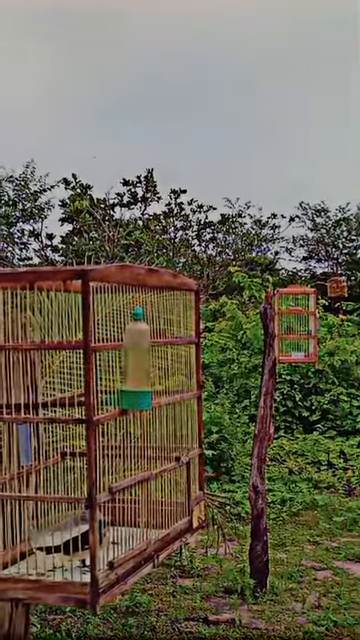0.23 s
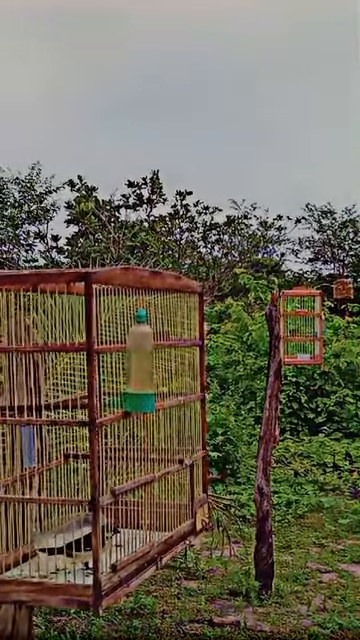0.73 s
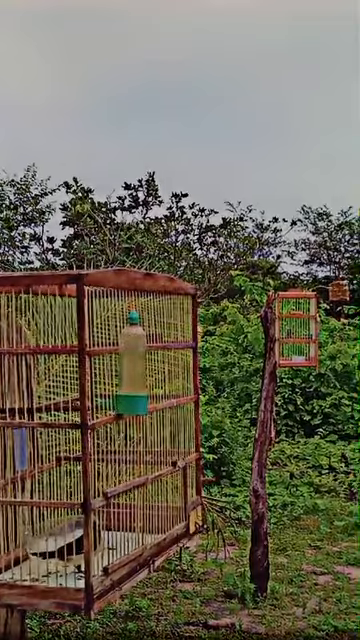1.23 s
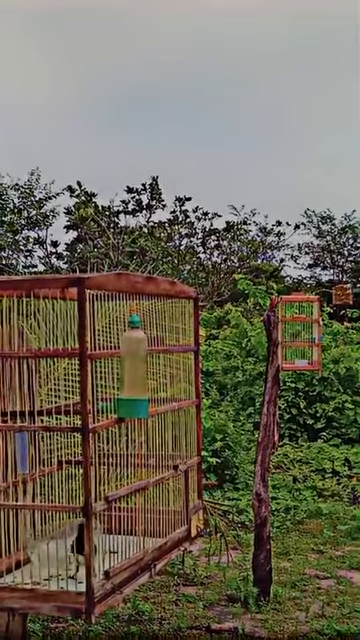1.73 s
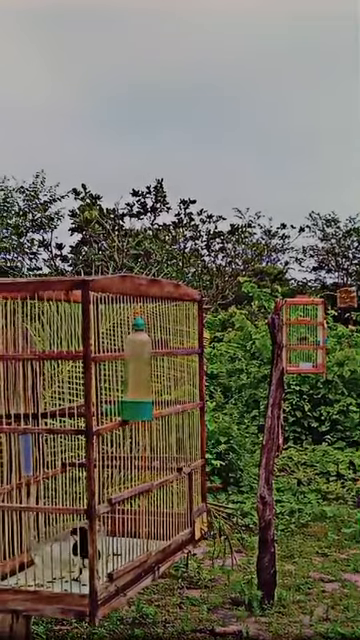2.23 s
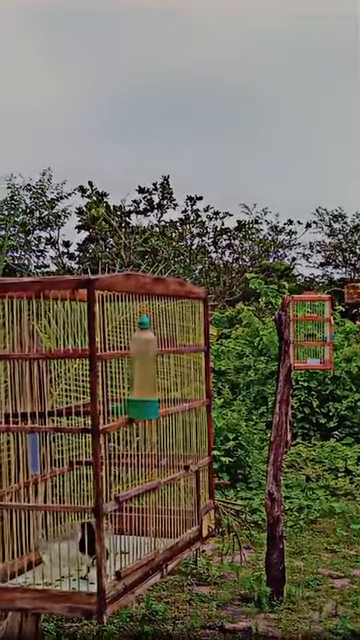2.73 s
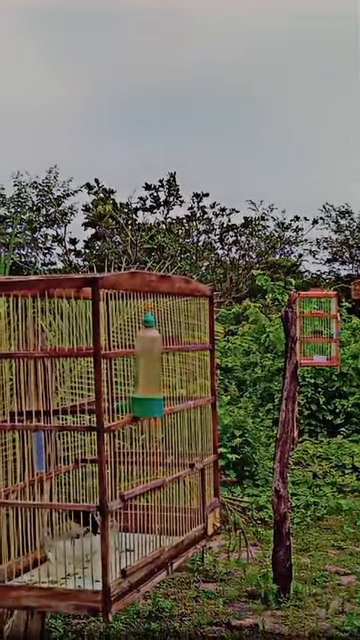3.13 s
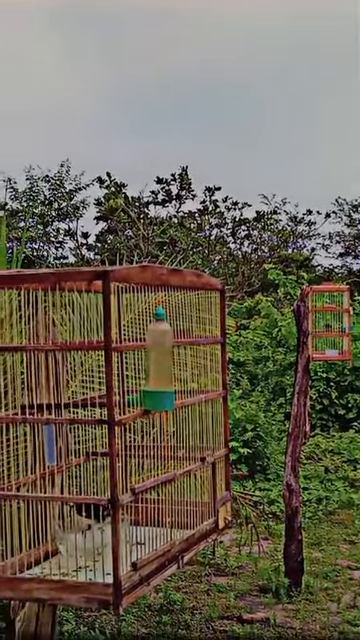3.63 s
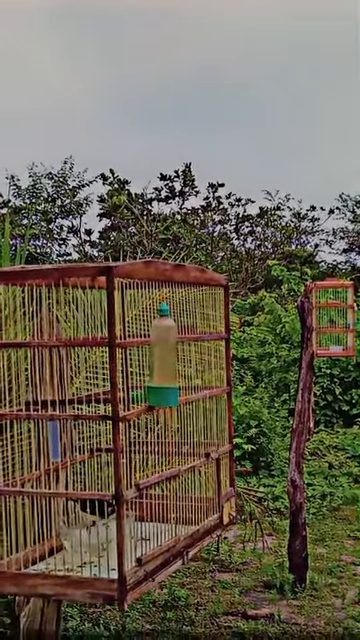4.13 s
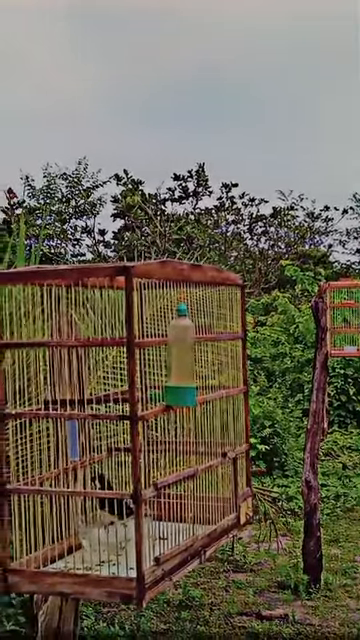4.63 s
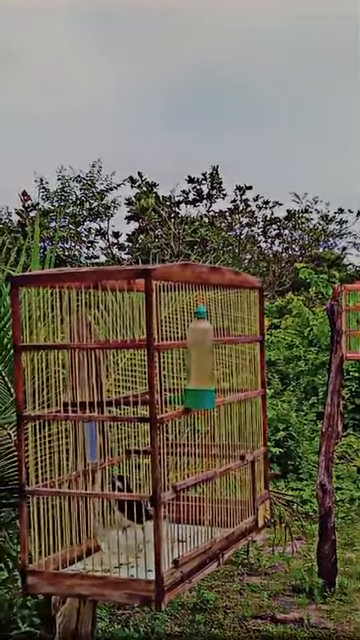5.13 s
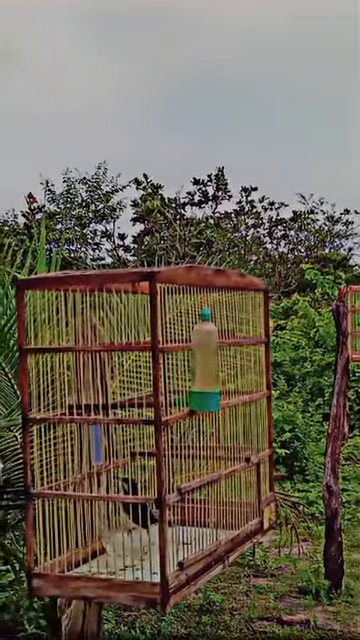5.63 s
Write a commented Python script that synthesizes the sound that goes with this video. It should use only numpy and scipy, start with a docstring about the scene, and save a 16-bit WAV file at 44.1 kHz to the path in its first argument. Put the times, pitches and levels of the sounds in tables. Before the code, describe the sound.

Outdoor garden, fairly dry, with short reflections off cage and bushes. A high continuous cricket whirr runs throughout. A nearby little bird starts quietly with pips and falling whistles, brushes its wings, trills evenly, slides up on a hoarse nasal tone, then chatters loudly and rapidly before stopping. Faint birds whistle further off.

```python
"""Caged seedeater in song

A seedeater in a wooden cage outdoors sings soft whistles, slurs and trills, a nasal rising note, then a loud
burst of chips and warbles: gliding tones with overtones. Wings flutter as filtered noise when it turns.
Short delays and decaying noise echo the song off cage and bushes. A cricket trills in falling wing-stroke
tones; small birds whistle further off, over noise bands of open air, low swells and distant insects."""
import sys
import numpy as np
from scipy import signal
from scipy.fft import rfft, irfft, next_fast_len
from scipy.io import wavfile
from scipy.ndimage import uniform_filter1d, map_coordinates

SR = 44100
rng = np.random.default_rng(int(sys.argv[2]) if len(sys.argv) > 2 else 0)


def to_wav(sig):
    """Store sig (one row per channel, or 1-D mono) as 16-bit WAV at the path in sys.argv[1].

    Samples outside -1..1 are clipped; the rate is SR.
    """
    pcm = np.clip(np.atleast_2d(sig), -1, 1) * 32767
    pcm = np.round(pcm).astype(np.int16)
    wavfile.write(sys.argv[1], SR, pcm.T)  # frames by channels


N = 259308
T = np.arange(N) / SR


def amp(db):
    """Decibels to linear gain."""
    return 10 ** (np.asarray(db) / 20)


def unit(x):
    """x scaled to rms 1."""
    return x / np.sqrt(np.mean(x ** 2) + 1e-20)


def along(points, hz):
    """(frequency [Hz], value) points read on a log frequency axis."""
    f, v = np.transpose(points)
    return np.interp(np.log(hz + 1), np.log(f + 1), v)


def curves(rows, t=T):
    """Each column after the first, read at the times t."""
    s, *cols = np.transpose(rows)
    return [np.interp(t, s, c) for c in cols]


def wobble(rate, n=N):
    """A smooth random curve with rate knots a second."""
    knots = rng.standard_normal(int(n * rate / SR) + 4)
    return map_coordinates(knots, [np.arange(n) * rate / SR])


def filtered(x, response):
    """x times a response of frequency."""
    m = next_fast_len(N + SR // 2)
    return irfft(rfft(x, m) * response(np.fft.rfftfreq(m, 1 / SR)), m)[:N]


def coloured(x, points):
    """x through a (frequency [Hz], level [dB]) spectrum."""
    return filtered(x, lambda hz: amp(along(points, hz)))


def noise(points):
    """Noise of rms 1 with the given spectral shape."""
    return unit(coloured(rng.standard_normal(N), points))


def add(out, s, x):
    """Mix x into out from time s on."""
    part = out[max(round(s * SR), 0):][:len(x)]
    part += x[:len(part)]


# Resonance of the throat: (frequency [Hz], width [Hz])
THROAT_RESONANCE = (4620, 593)


def throat(hz):
    """Gain of the throat's resonance, which favours partials near its centre."""
    centre_hz, width_hz = THROAT_RESONANCE
    return 1 / (1 + ((hz - centre_hz) / width_hz) ** 4)


def gesture(rows):
    """Control curves smoothed by muscle inertia, and a gate that opens and shuts softly."""
    fade_s = .0035
    t = np.arange(rows[0][0], max(rows[-1][0], rows[0][0] + 2 * fade_s), 1 / SR)
    edge = np.clip(np.minimum(t - t[0], t[-1] - t) / fade_s, 0, 1)
    gate = np.sin(np.pi / 2 * edge) ** 2
    return [uniform_filter1d(c, size=64) for c in curves(rows, t)] + [gate]


# Overtones of the voice: (multiple of the pitch, level when soft [dB], level when forced [dB])
VOICE_OVERTONES = [(2, -27.5, -32), (3, -32, -36.5), (4, -42, -42.5), (5, -56, -55.5)]
FORCED_DB, FORCED_RANGE_DB = -38, 14.5  # straining begins at this level; fully forced this much higher


def whistle(rows, rasp, overtones, shimmer_db=3.32, forced_shimmer_db=-0.6, blur=1.0):
    """The syrinx makes a nearly pure tone with weak overtones, which blur when it is forced."""
    hz, db, gate = gesture(rows)
    n = len(hz)
    forced = np.clip((db - FORCED_DB) / FORCED_RANGE_DB, 0, 1)
    unsteady = .002 + .0004 * np.maximum(db + 32, 0)
    phase = 2 * np.pi * np.cumsum(hz * (1 + unsteady * wobble(800, n))) / SR
    upper = np.zeros(n)
    for k, soft, hard in overtones:
        gain = amp(soft + forced * (hard - soft) + 3.2 * wobble(300, n))
        partial = np.sin(k * phase + blur * forced * wobble(1800, n))
        upper += gain * partial * (k * hz < SR / 2)
    # A rasping note doubles its period; the throat passes the extra partials that lie near it.
    harsh = np.zeros(n)
    for k in (3 / 2, 2, 5 / 2):
        harsh += (throat(k * hz) + 0.075) * np.sin(k * phase) * (1 + 0.5 * wobble(555.8, n))
    level = amp(db + (shimmer_db + forced_shimmer_db * forced) * wobble(250, n))
    return gate * level * (np.sin(phase) + upper + rasp * harsh)


def sing(notes, rasp=0, overtones=VOICE_OVERTONES):
    """Whistle each list of (time [s], pitch [Hz], level [dB]) rows at its time."""
    out = np.zeros(N)
    for rows in notes:
        add(out, rows[0][0], whistle(rows, rasp, overtones))
    return out


def stretched(shape, s, length, high, low, db, contrast=1):
    """A syllable shape laid over one note's length, pitch range and strength."""
    return [(s + u * length, low + p * (high - low), db + contrast * level) for u, p, level in shape]


def syllables(table, shape):
    """Sing one syllable shape for each (time, length, high, low, level) note."""
    return sing([stretched(shape, *note) for note in table])


# Falling chip: (share of the note's length [0-1], pitch from low to high [0-1], level [dB])
CHIP_SHAPE = [(0, .8, -19), (.1, .97, -4), (.2, .87, 0), (.4, .57, -2), (.62, .37, -2), (.78, .23, -10),
              (.9, .09, -20), (1, 0, -27)]
# Strokes of a chatter phrase, two ticks and two longer chips:
# (time after its start [s], length [s], high [Hz], low [Hz], level [dB], share of the hold-back [0-1]),
# times and lengths before the phrase's stretch
PHRASE_STROKES = [(0, .0125, 4280, 2750, -1.5, .8), (.012, .008, 4880, 3400, -2, 1),
                  (.018, .0245, 4730, 2400, 1, .35), (.0495, .034, 4800, 1880, 0, 0)]
# The phrases: (time [s], stretch in time [ratio], level [dB], hold-back of the opening [dB])
CHATTER_PHRASES = [(4.397, 0.78, -29, 16), (4.4985, .93, -25.5, 4), (4.6101, .92, -16, 17),
                   (4.9801, 1, -16, 1.5), (5.0993, 0.99, -16.5, 0), (5.2176, 0.99, -17.5, -4)]
# Grace notes ahead of a long chip: (time [s], length [s], high [Hz], low [Hz], level [dB])
GRACE_NOTES = [(4.427, 0.0082, 5050, 3400, -36.5), (4.6464, 0.016, 5280, 3520, -35)]


def chatter():
    """The syrinx fires one four-stroke phrase six times; the first three are hurried and open softly."""
    chips = []
    for s, stretch, db, held_db in CHATTER_PHRASES:
        for after, length, high, low, level, share in PHRASE_STROKES:
            stroke_db = db + level - share * held_db
            chips.append((s + stretch * after, stretch * length, high, low, stroke_db))
    return syllables(chips + GRACE_NOTES, CHIP_SHAPE)


# Closing slide of a warble: (time after the last crest [s], pitch [Hz], level against the warble [dB])
CLOSING_SLIDE = [(.005, 3144, 3), (.012, 2345, -5), (.025, 1500, -42)]
SWING_HZ, ARCH_HZ, SWING_SCATTER_HZ = 786, 343, 154  # swing either side of centre; arch height; unevenness
WARBLE_SWELL_DB, WARBLE_SWELL_S, TROUGH_DB = 7, 0.0088, -2  # swelling start; dip at the foot of each swing
DOWNSTROKE_DB = 2  # the falling half of each swing is louder, the rising half softer by this much


def warble(s, period, centre_hz, db, count=12):
    """The pitch swings up and down under a shallow arch, then slides away from the last crest."""
    turn = np.arange(count)
    arch_hz = ARCH_HZ * (np.sin(np.pi * turn / (count - 1)) - .5)
    scatter_hz = SWING_SCATTER_HZ * rng.standard_normal(count)
    turn_hz = centre_hz - SWING_HZ * np.cos(np.pi * turn) + arch_hz + scatter_hz
    step = np.arange(2 * count - 1) / 2  # every turning point and the midpoints between
    t = step * period / 2
    level = db - WARBLE_SWELL_DB * np.exp(-t / WARBLE_SWELL_S)
    level += TROUGH_DB * np.cos(np.pi * step / 2) ** 2
    level -= DOWNSTROKE_DB * np.sin(np.pi * step)
    swings = list(zip(s + t, np.interp(step, turn, turn_hz), level))
    return swings + [(s + t[-1] + after, fall_hz, db + fall_db) for after, fall_hz, fall_db in CLOSING_SLIDE]


# Harsh warbles: (time [s], period of a swing [s], centre [Hz], level [dB])
HARSH_WARBLES = [(4.7205, .0127, 3643, -21), (4.8583, .0118, 3292, -19.5)]


def warbles():
    """Fast pitch swings, made harsh by period doubling in the syrinx."""
    return sing([warble(*row) for row in HARSH_WARBLES], rasp=.16)


# Freely gliding notes, one list each: (time [s], pitch [Hz], level [dB])
GLIDING_NOTES = [
    [(.195, 2520, -52), (.212, 3580, -54.5), (.26, 3647, -45.5), (.32, 3620, -51), (.38, 3530, -60)],
    [(1.942, 4630, -46.5), (1.951, 5300, -44), (1.961, 5700, -40), (1.976, 5400, -56)],
    [(5.347, 5110, -40), (5.353, 5280, -40), (5.359, 5664, -47.5), (5.364, 5370, -20.5),
     (5.372, 4575, -18.5), (5.382, 3910, -23.5), (5.398, 3244, -25), (5.406, 3072, -34.5),
     (5.413, 2986, -60)],
]


def glides():
    """Single whistles whose pitch moves freely as the syrinx changes its tension."""
    return sing(GLIDING_NOTES)


# Hiss of a forced note: (frequency [Hz], relative level [dB per Hz])
SPRAY_SPECTRUM = [(1200, -36), (2500, -4), (5000, 0.5), (8000, 7), (10500, -8), (13000, -2), (15500, -0.5)]


def spray(x, spray_db=-32):
    """Breath turbulence: a wide hiss that follows the strength of the notes."""
    return amp(spray_db) * uniform_filter1d(np.abs(x), size=128) * noise(SPRAY_SPECTRUM)


# Small pip: (share of the note's length [0-1], pitch from low to high [0-1], level [dB])
PIP_SHAPE = [(0, 1, -16), (.3, .75, -3), (.55, .45, 0), (.75, .15, -4), (1, 0, -16)]
# Hooked trill note: (share of the note's length [0-1], pitch from low to high [0-1], level [dB])
HOOK_SHAPE = [(0, 0, -12), (.13, .4, -9), (.3, .63, -19), (.55, .86, -19), (.64, .93, -11), (.73, .98, -1),
              (.82, 1, 0), (.92, .99, -6), (1, .97, -14)]
# Range and effort along the trill:
# (time [s], high [Hz], low [Hz], level [dB], how far the top stands out of the upsweep [0-1])
TRILL_COURSE = [(2.29, 4074, 2590, -40, 0.9), (2.36, 3970, 2308, -39, 0.73), (2.431, 3893, 1980, -32.5, 1),
                (2.598, 3903, 1920, -32, 1), (2.72, 3830, 1890, -35.5, 0.91), (2.79, 3884, 1905, -29.5, 1),
                (2.92, 3688, 1764, -42, 0.43), (3.099, 3670, 1770, -41, 0.47), (3.19, 2866, 1750, -54, 0)]
# Overtones in the trill: (multiple of the pitch, level when soft [dB], level when forced [dB])
TRILL_VOICE = [(2, -34.5, -30), (3, -34, -29), (4, -39.5, -45.5), (5, -55, -50)]
TRILL_START_S, TRILL_PERIOD_S, TRILL_NOTE_S = 2.3068, .0566, .0445
TRILL_DRAG_S, TRILL_PICKUP_NOTES = 0.022, 0.38  # the first note is earlier and longer; how soon this fades


def trill(count=17, lag=0.88, blip_s=0.0055, high_hz=2600, low_hz=2000, under_db=-19):
    """Hooked notes at an even pace, each with a soft low blip from the other side of the syrinx."""
    k = np.arange(count)
    drag = TRILL_DRAG_S * np.exp(-k / TRILL_PICKUP_NOTES)
    starts = TRILL_START_S + k * TRILL_PERIOD_S - drag
    notes = list(zip(starts, TRILL_NOTE_S + drag, *curves(TRILL_COURSE, starts)))
    hooks = [stretched(HOOK_SHAPE, *note) for note in notes]
    blips = [(s + lag * length, blip_s, high_hz, low_hz, db + under_db)
             for s, length, high, low, db, contrast in notes]
    return sing(hooks, overtones=TRILL_VOICE) + syllables(blips, PIP_SHAPE)


# Rising note: (share of the note's length [0-1], pitch from low to high [0-1], level [dB])
RISE_SHAPE = [(0, 0.016, -2), (.15, 0.39, -11.5), (.35, .5, -8), (0.618, .6, -5.5), (.8, .85, -3),
              (.93, .98, -0.5), (1, 1, -29)]
# Rising notes that lead into the trill: (time [s], length [s], high [Hz], low [Hz], level [dB])
RISING_NOTES = [(1.988, 0.051, 5260, 2580, -37.5), (2.066, 0.049, 5090, 2577, -38.5),
                (2.14, 0.053, 5110, 2405, -39.5), (2.216, 0.051, 4630, 2500, -44)]


def rises():
    """Quick upsweeps of the syrinx that lead into the trill."""
    return syllables(RISING_NOTES, RISE_SHAPE)


# Falling slur: (share of the note's length [0-1], pitch from low to high [0-1], level [dB])
SLUR_SHAPE = [(0, 1, -14), (.09, .83, 0), (.24, .52, 1), (.38, .32, -1), (.5, .22, -15), (.8, .1, -21),
              (1, 0, -26)]
# Two falling slurs: (time [s], length [s], high [Hz], low [Hz], level [dB])
SLUR_NOTES = [(.696, 0.084, 5130, 3224, -30), (.916, 0.095, 4905, 3215, -31)]


def slurs():
    """Whistles that drop steeply and then trail off softly."""
    return syllables(SLUR_NOTES, SLUR_SHAPE)


# A run of pips that settles on one pitch: (time [s], level [dB])
PIP_RUN_NOTES = [(1.171, -43), (1.237, -39.5), (1.292, -37), (1.348, -39), (1.398, -38.5), (1.452, -37),
                 (1.5, -37.5), (1.566, -37), (1.624, -37), (1.748, -43), (1.803, -37.5)]
PIP_S, SETTLE_S = 0.031, 0.12  # length of a pip; time the run takes to settle
PIP_HIGH_HZ, PIP_LOW_HZ = 3889, 3792  # start and end of a settled pip
PIP_HIGH_LIFT_HZ, PIP_LOW_LIFT_HZ = 1350, 757  # how much higher the run begins


def pip_run():
    """Falling pips that start high and steep, then sink and flatten."""
    s, db = np.transpose(PIP_RUN_NOTES)
    lift = np.exp(-((s - s.min()) / SETTLE_S) ** (3 / 2))
    high = PIP_HIGH_HZ + PIP_HIGH_LIFT_HZ * lift
    low = PIP_LOW_HZ + PIP_LOW_LIFT_HZ * lift
    return syllables(zip(s, np.full(len(s), PIP_S), high, low, db), PIP_SHAPE)


# Single soft pips: (time [s], length [s], high [Hz], low [Hz], level [dB])
SOFT_PIP_NOTES = [(0.373, 0.048, 3560, 3050, -52), (.425, 0.042, 3460, 3080, -49),
                  (.465, 0.04, 3430, 3040, -49.5), (0.51, 0.042, 3320, 3090, -49),
                  (.667, 0.016, 6440, 5800, -39), (.68, 0.022, 5920, 4880, -45),
                  (0.773, 0.014, 2630, 1760, -50), (.801, 0.0143, 2640, 2060, -57),
                  (0.891, 0.017, 6800, 5540, -53.5), (1.004, 0.015, 2660, 1630, -50.5),
                  (1.033, 0.0093, 2750, 2140, -50), (3.27, 0.015, 1880, 1790, -54.5)]


def soft_pips():
    """Brief falling whistles at low effort."""
    return syllables(SOFT_PIP_NOTES, PIP_SHAPE)


# Hoarse arch and then a long rise: (time [s], pitch [Hz], fundamental level [dB], overtone level [dB])
NASAL_NOTE = [(3.383, 1525, -81, -57), (3.415, 2424, -63.5, -47), (3.44, 2180, -64, -47.5),
              (3.448, 1316, -69.5, -53.5), (3.472, 1634, -60.5, -36.5), (3.523, 2452, -51, -45.5),
              (3.563, 2088, -58.5, -39.5), (3.707, 2520, -64.5, -53.5), (3.818, 2630, -51.5, -41),
              (3.869, 2694, -50, -51), (3.905, 2757, -48.5, -39.5), (3.96, 2726, -42, -66),
              (3.975, 2880, -73, -70)]
# Overtones that bypass the throat: (multiple of the pitch, level [dB])
THROAT_BYPASS = [(2, -16.5), (3, -24.5), (4, -32), (5, -35.5), (6, -35)]
HOARSE_S, HOARSE_JITTER, HOARSE_GRAIN = .12, .008, .35  # fade time; roughness of pitch and of level
SECOND_SIDE, SECOND_SIDE_DB = .83, -6  # pitch ratio and level of the second side


def nasal():
    """A low buzzy voice, its overtones picked out by the throat; the syrinx's second side joins at first."""
    hz, base_db, over_db, gate = gesture(NASAL_NOTE)
    n = len(hz)
    rough = np.exp(-(np.arange(n) / SR / HOARSE_S) ** 2)
    voice = np.zeros(n)
    for pitch, gain in ((hz, 1), (SECOND_SIDE * hz, amp(SECOND_SIDE_DB) * rough)):
        phase = 2 * np.pi * np.cumsum(pitch * (1 + HOARSE_JITTER * rough * wobble(420, n))) / SR
        upper = np.zeros(n)
        for k, leak_db in THROAT_BYPASS:
            passed = throat(k * pitch) + amp(leak_db)
            upper += passed * amp(2.1 * wobble(160, n)) * np.sin(k * phase)
        base = amp(base_db + 3.1 * wobble(160.9, n)) * np.sin(phase)
        voice += gain * (base + amp(over_db) * upper)
    out = np.zeros(N)
    add(out, NASAL_NOTE[0][0], gate * voice * (1 + HOARSE_GRAIN * rough * wobble(1000, n)))
    return out


# Radiation from the beak: (frequency [Hz], gain [dB])
BEAK_RADIATION = [(1200, 4), (1900, -2.5), (2450, -10.5), (3100, -3.5), (6500, -0.5), (8600, -10),
                  (10500, 6.5), (11600, -3), (13000, -7.5), (15000, 4), (16000, 1.5)]


def song():
    """All the voiced notes with the hiss of the strong ones, coloured as they leave the beak."""
    soft = slurs() + pip_run() + soft_pips() + rises() + trill() + nasal()
    strong = chatter() + warbles() + glides()
    return coloured(soft + strong + spray(strong), BEAK_RADIATION)


# Bill clicks: (time [s], peak level [dB])
BILL_CLICKS = [(4.986, -47.5), (5.107, -48), (5.227, -46), (5.369, -60)]


def bill(width_s=0.000042):
    """The bill snaps as it opens for a loud phrase: one tiny pressure pulse."""
    return sum(amp(db) * np.exp(-np.abs(T - s) / width_s) for s, db in BILL_CLICKS)


# Wing flutter: (time [s], level [dB])
WING_FLUTTER = [(1.672, -78), (1.683, -44), (1.69, -44), (1.702, -41.5), (1.718, -45.5), (1.735, -45),
                (1.748, -51), (1.78, -63.5)]
# Feather noise: (frequency [Hz], relative level [dB per Hz])
FEATHER_SPECTRUM = [(710, -86), (1200, -57), (1750, -29), (2500, -17.5), (3100, -22), (3680, -5.5),
                    (4670, 6), (5040, -5), (5260, 0), (6600, 0), (8640, -23), (10400, -15.5), (11900, -29),
                    (15800, -17)]
# Claws on the perch: (time [s], level before the tap gain [dB])
CLAW_TAPS = [(1.553, -57.5), (1.592, -66), (2.854, -66)]


def movement(wing_db=0, tap_db=-7, tap_t60=0.041):
    """Feathers brush the bars in a short flutter of noise; claws tick on the perch in decaying bursts."""
    level, = curves(WING_FLUTTER)
    fluttering = (T > WING_FLUTTER[0][0]) * (T < WING_FLUTTER[-1][0])
    flutter = amp(level + wing_db + 2.5 * wobble(250)) * fluttering
    ticks = sum(amp(db + tap_db - 60 * np.abs(T - s) / tap_t60) * (T >= s) for s, db in CLAW_TAPS)
    tick_noise = noise([(300, -25), (2500, -4.5), (8000, -13.0), (11000, -7), (15000, -30.0)])
    return flutter * noise(FEATHER_SPECTRUM) + ticks * tick_noise


# Cage floor and roof, ground, a wall: (delay [s], level [dB])
CAGE_ECHOES = [(.0043, -14), (.0092, -13), (0.0088, -33), (0.018, -19), (.0285, -24)]


def cage(x):
    """Nearby surfaces return a few quick copies."""
    return filtered(x, lambda hz: sum(amp(db) * np.exp(-2j * np.pi * hz * delay)
                                      for delay, db in CAGE_ECHOES))


# Decay of the bushes' echo: (frequency [Hz], time to fall 60 dB [s])
BUSH_DECAY = [(1500, 0.094), (3500, 0.24), (5500, 0.25), (9000, 0.207), (15000, 0.0954)]


def garden(x, near_t60=0.021, far_db=-11, onset=0.03):
    """Nearby leaves scatter a short dense echo, the bushes behind a longer faint one."""
    hz, t, z = signal.stft(rng.standard_normal(SR), SR, nperseg=256)
    near = amp(-60 * t / near_t60)
    far = amp(far_db - 60 * t / along(BUSH_DECAY, hz)[:, None])
    build_up = 1 - np.exp(-t / onset)
    tail = signal.istft(z * (near + far) * build_up, SR, nperseg=256)[1]
    return signal.fftconvolve(x, tail / np.linalg.norm(tail))[:N]


# Cricket loudness before its gain: (time [s], level [dB])
CRICKET_LEVEL = [(0.0, -57), (2.8, -59.5), (3.22, -56.5), (3.47, -60.5), (4.13, -57), (4.62, -61.5),
                 (4.8, -59.5), (5.88, -54.5)]
# Resonance of the cricket's wing: (frequency [Hz], level [dB])
WING_HARP = [(5600, -42), (6100, -15), (6350, -2), (6600, -4), (6720, 5.5), (6820, -7.5), (6960, -2.5),
             (7070, 0.5), (7180, 0.5), (7320, -9.5), (7550, -13.5), (7850, -57.5)]


def cricket(start_hz=7280, fall_hz=720, gain_db=0.5, ground_db=-10):
    """Each wing stroke is a falling tone; the ground echoes it and grass scatters it into a narrow hiss."""
    stroke_hz, scatter = 66.4, .4
    stroke = np.cumsum(stroke_hz * (1 + 0.0026 * wobble(12))) / SR % 1  # position within the stroke
    phase = 2 * np.pi * (start_hz * stroke - fall_hz * stroke ** 2 / 2) / stroke_hz
    tone = np.sqrt(np.sin(np.pi * stroke)) * np.sin(phase + .4 * wobble(250))
    tone = tone + amp(ground_db) * np.roll(tone, round(0.0044 * SR))
    level, = curves(CRICKET_LEVEL)
    trilling = unit(unit(coloured(tone, WING_HARP)) + scatter * noise(WING_HARP))
    return amp(level + gain_db + 0.44 * wobble(4.4)) * trilling


# Birds further off, one list a note: (time [s], pitch [Hz], level before the distance gain [dB])
FAR_NOTES = [
    [(.315, 5480, -70), (.35, 5710, -49.5), (.39, 5660, -65), (.41, 5800, -59), (.445, 4230, -58)],
    [(2.615, 5550, -66), (2.66, 5670, -52), (2.72, 5380, -68), (2.77, 5110, -69), (2.86, 4640, -92)],
    [(5.852, 5350, -66), (5.868, 5580, -48.5), (5.9, 5420, -53.5)],
]


def far_birds():
    """Gliding whistles from the same kind of voice."""
    return sing(FAR_NOTES)


def swells(table, rise, fall):
    """Gain that climbs to each (time [s], level [dB]) crest and dies away, at slopes in dB a second."""
    return sum(amp(db - np.maximum(rise * (s - T), fall * (T - s))) for s, db in table)


# Crests of the distant low swells: (time [s], level before the hum gain [dB])
HUM_CRESTS = [(.06, -74), (1.0, -61.5), (2.31, -61.5), (3.65, -70.5), (4.98, -63.5)]
HUM_RISE_DB_PER_S, HUM_FALL_DB_PER_S = 98, 238.5
# Soft low bumps: (time [s], level before the rumble gain [dB])
LOW_BUMPS = [(1.29, -65.5), (2.62, -63.5), (3.48, -70)]
BUMP_DB_PER_S = 150  # slope on either side of a bump
RUMBLE_DB, RUMBLE_DRIFT_DB = -88.5, 1.5  # rumble between the bumps, before the rumble gain; its drift


def low_swells(hum_db=-1, rumble_db=-5):
    """A wavering low tone in noise swells up at times, over a rumble with soft bumps."""
    hum = swells(HUM_CRESTS, HUM_RISE_DB_PER_S, HUM_FALL_DB_PER_S)
    tone = np.sin(2 * np.pi * np.cumsum(124 + 3 * wobble(36)) / SR)
    drone = unit(tone + .4 * noise([(80, -37.0), (115, -1.5), (140, -7.0), (220, -55.5)]))
    bumps = swells(LOW_BUMPS, BUMP_DB_PER_S, BUMP_DB_PER_S)
    rumble = bumps + amp(RUMBLE_DB + RUMBLE_DRIFT_DB * wobble(1.4))
    rumble_noise = noise([(35, -49.0), (75, -12.0), (92, 9), (120, -35.5), (200, -48.0)])
    return amp(hum_db) * hum * drone + amp(rumble_db) * rumble * rumble_noise


# Distant insects: (time [s], level [dB])
INSECT_LEVEL = [(0, -90.5), (2.5, -83.5), (4.2, -82), (5.88, -81)]
# Their band: (frequency [Hz], relative level [dB per Hz])
INSECT_BAND = [(2200, -20), (2800, -3), (3400, -3), (4200, -1.5), (4600, -10.5), (6000, -44)]


def far_insects():
    """Many distant insects blend into a band of noise with a wavering level."""
    level, = curves(INSECT_LEVEL)
    return amp(level + wobble(5.8)) * noise(INSECT_BAND)


# Open air: (frequency [Hz], relative level [dB per Hz])
AIR_SPECTRUM = [(20, -32), (40, -21), (62, -2.5), (85, 3.5), (130, 2.5), (180, -0.5), (245, -1.5),
                (330, -8.5), (570, -8.5), (720, -12.5), (1300, -14.5), (2400, -19.5), (3500, -35.5)]
# High hiss: (frequency [Hz], relative level [dB per Hz])
HISS_SPECTRUM = [(1200, -25), (2500, -11), (5500, -1), (7200, -10.5), (8400, -23.5), (9600, -11),
                 (12000, -16), (13800, -13), (15200, 2), (15800, -6)]


def background(air_db=-78.5, hiss_db=-84, whine_db=-98, whine_hz=14200):
    """Noise of quiet open air and hiss, with low swells, far insects and a thin high whine."""
    air = amp(air_db + 0.23 * wobble(5.4)) * noise(AIR_SPECTRUM)
    hiss = amp(hiss_db) * noise(HISS_SPECTRUM)
    whine = amp(whine_db) * np.sin(2 * np.pi * np.cumsum(whine_hz + 40 * wobble(200)) / SR)
    return air + hiss + low_swells() + far_insects() + whine


def scene():
    """The caged bird close by with its echoes, the far birds, the cricket and the open air."""
    bird = song() + movement() + bill()
    near = bird + cage(bird) + amp(-22.0) * garden(bird)
    far = far_birds()
    distant = amp(-9.0) * far + amp(-4.5) * garden(far)
    return (near + distant + cricket() + background())[None]


def record(dry, top_hz=15830):
    """The recorder keeps nothing above its band limit."""
    return filtered(dry[0], lambda hz: hz < top_hz)[None]


dry = scene()
out = record(dry)
to_wav(out)
```